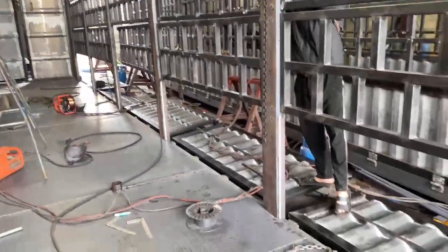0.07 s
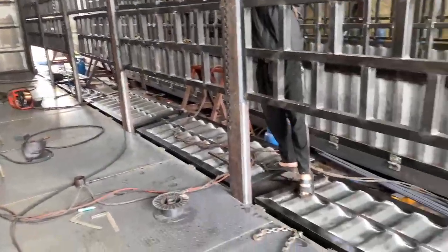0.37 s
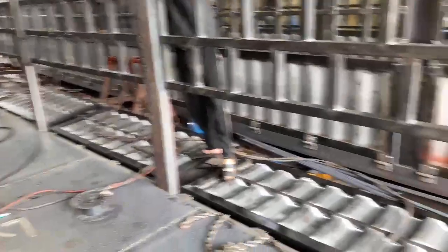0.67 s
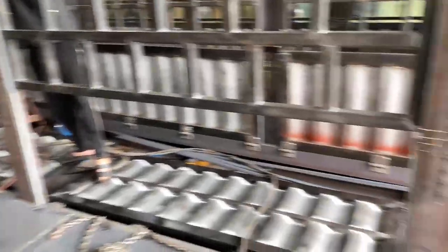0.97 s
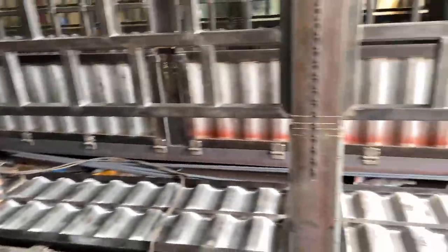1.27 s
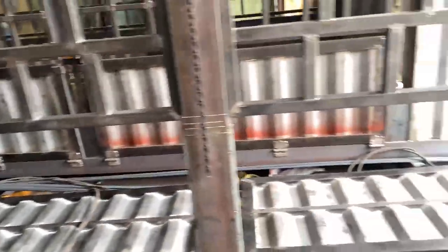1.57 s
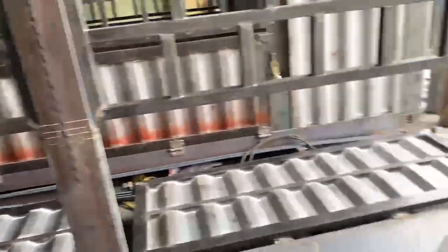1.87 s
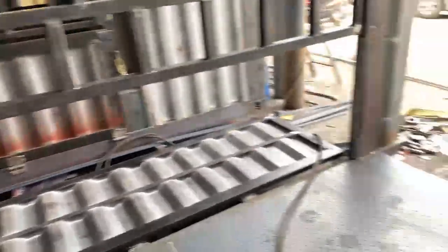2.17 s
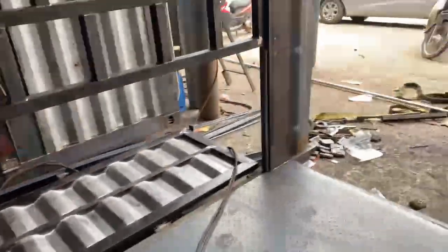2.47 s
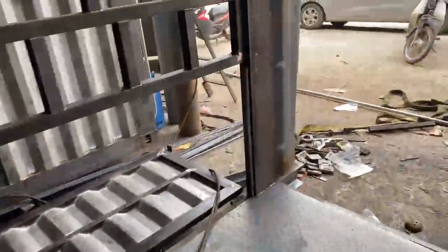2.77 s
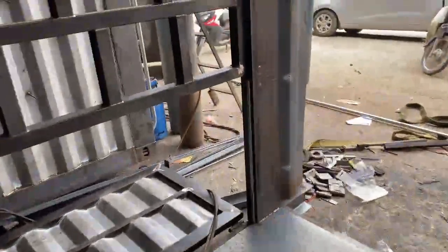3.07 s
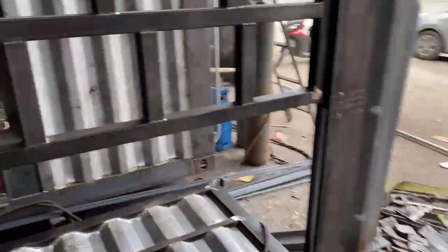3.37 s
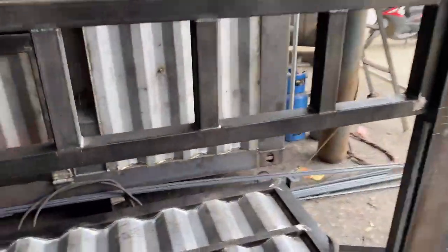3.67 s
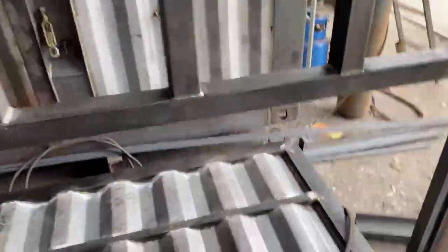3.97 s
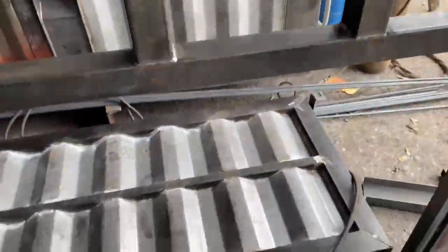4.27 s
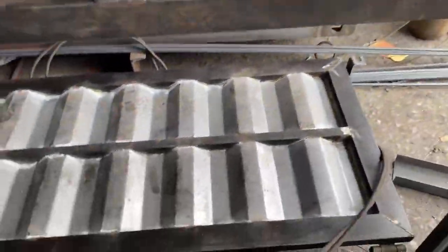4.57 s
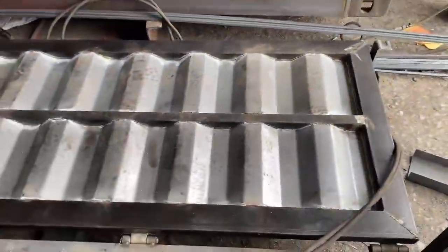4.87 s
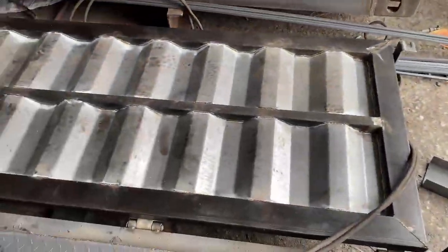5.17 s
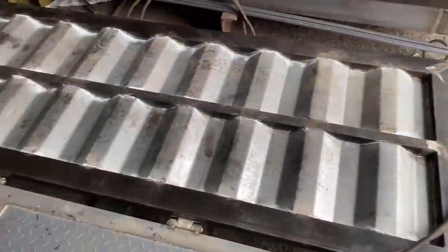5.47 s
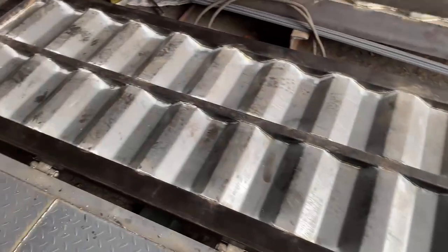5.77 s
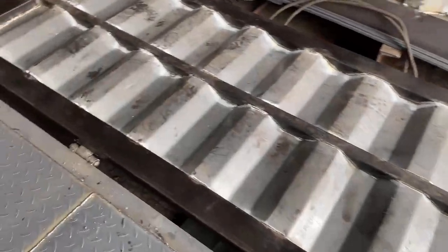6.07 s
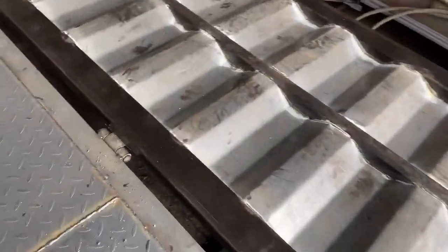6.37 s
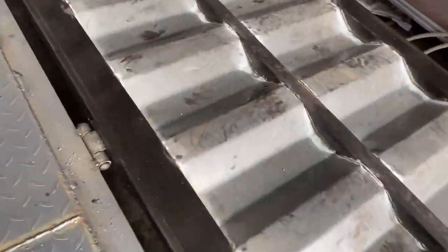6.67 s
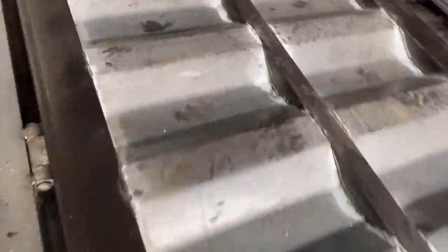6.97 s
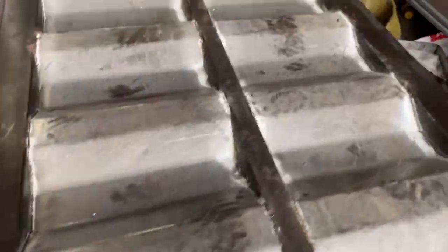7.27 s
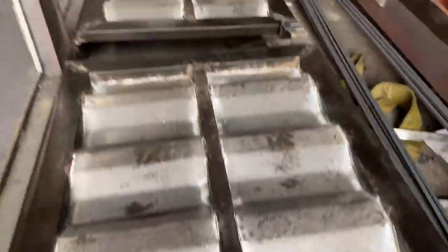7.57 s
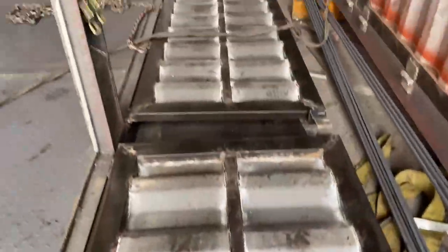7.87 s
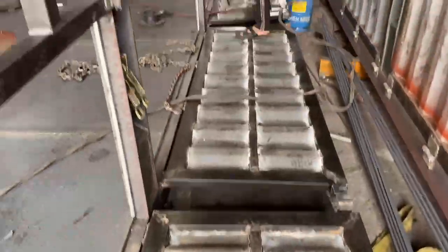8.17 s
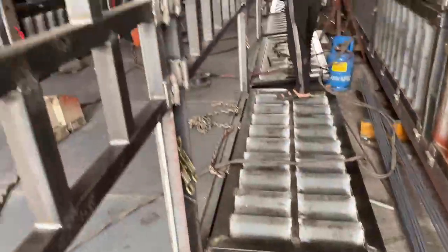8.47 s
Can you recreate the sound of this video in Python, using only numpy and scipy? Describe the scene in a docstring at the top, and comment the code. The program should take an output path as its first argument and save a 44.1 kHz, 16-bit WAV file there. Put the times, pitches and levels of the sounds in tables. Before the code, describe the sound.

A hammer strikes the steel frame of a truck body about twice a second, each sharp clang leaving the frame and its ribbed sheets ringing through a workshop. After five blows it pauses, and softer knocks and a faint steel clink sound farther off. Six more blows follow with less crack, as if the microphone faces away. An engine throbs faintly outside over a steady street hush.

```python
"""In a workshop, a hammer strikes the steel frame of a truck body: two runs of blows with a pause between.
Each blow cracks, clangs the struck bar, sets the frame and its ribbed sheets ringing and fills the hall;
most are followed by a soft shudder of the sheets. The second run is heard facing away, with less crack.
In the pause, lesser knocks sound about the shop and a loose piece of steel clinks as it settles.
An engine throbs outside, over the street's hush."""
import sys
import numpy as np
from scipy import signal
from scipy.fft import rfft, irfft
from scipy.io import wavfile
from scipy.ndimage import uniform_filter1d

SR = 44100
rng = np.random.default_rng(int(sys.argv[2]) if len(sys.argv) > 2 else 0)


def pcm_store(signal):
    """Save signal as 16-bit PCM."""
    levels = np.round(np.clip(np.atleast_2d(signal), -1, 1) * 32767)
    wavfile.write(sys.argv[1], SR, levels.astype(np.int16).T)


N = 380624
RING_SIZE = 98304  # samples in which one blow rings out
AGE = np.arange(RING_SIZE) / SR  # s since the onset
FREQ = np.fft.rfftfreq(RING_SIZE, 1 / SR) + 1  # Hz, kept above zero for the log axes
SIDES = np.array([[1], [-1]])  # left, right


# hammer hits, with each layer's trim: t/s, level/dB, direct crack/dB, clang/dB, bite f/Hz, bite/dB,
# clank/dB, clank length/ms, thud/dB, low partials/dB, bar ring/dB, bar centre f/Hz, shudder/dB
BLOW_CUES = [(-0.267, 1.5, 6.5, 6, 3050, 14, -9, 15, -0.5, 6, 0, 1900, 3.5),
             (0.1975, 2.5, 5, 1.5, 3330, -4, -3, 26, -0.5, 1, -6, 1750, 4.5),
             (0.6579, 0.5, 5.5, 0, 3300, -7, 0, 28, -1, 6, -4, 1940, 5),
             (1.148, -0.14, 3, 2, 3030, 8, 0, 23, 0, -3, -1, 1780, 2.5),
             (1.6095, 0.5, 4, 0, 1920, 24, -7, 30, -0.5, -5, 0, 2050, -4),
             (2.292, -0.3, 3, 2.5, 2840, 17, -17.5, 13, 1, 1.5, -4, 1980, -33),
             (5.1223, 2.5, -17, -0.5, 1370, 32, -6.5, 28, -2.5, -2, -5, 1480, 0.5),
             (5.602, 2.5, -5.5, 3.5, 3600, 2, -2.5, 32, 0, -6, -6, 1900, 4),
             (6.1101, 1, -2, -0.5, 2880, 0, 0, 37, -1.5, -13, -2, 2850, 5),
             (6.599, 1, 2, 2, 1500, 6, -3, 38, -1, -14, 1, 1000, 2.5),
             (7.139, 1.5, -20, -1, 2900, -12, -0.5, 52, 1.5, 4.5, -4, 680, 4),
             (7.459, -6, -10, 5.5, 2800, 12, -14, 56, 0, 1, -0.5, 680, -35)]
# panning of crack, clank and dense ring: f/Hz, left minus right/dB
BLOW_PAN = [(130, -1), (300, -1), (620, 3), (1000, 2.5), (2000, -2.5), (4000, 0.5), (12000, 0)]

def hammering(fades, frame_db, ring_db=-7.5, crack_db=11.5, partial_db=-30, bite_share=0.13):
    """Every blow sounds through the same frame, coloured by the spot where it lands."""
    pan = undb(SIDES * at(BLOW_PAN, FREQ) / 2)
    treble_octaves = np.log2(np.maximum(FREQ / 1000, 1))
    bar_clang, sheet_thud = hump(hz=725, octaves=0.26), hump(hz=170, octaves=0.98)
    fade_out = np.minimum(2 * AGE[::-1], 1)
    out = np.zeros((2, N))
    for (s, db, direct_db, clang_db, bite_hz, bite_db, clank_db, clank_ms,
         thud_db, low_db, bar_db, bar_hz, _) in BLOW_CUES:
        # the less crack comes straight, the slower, brighter and richer in early reflections the ring
        swell_ms = 5.8 - 0.61 * direct_db
        tilt_db = (2.5 - 0.044 * direct_db) * treble_octaves
        early_db = -9.5 - 0.49 * direct_db
        spot_db = tilt_db + clang_db * bar_clang + thud_db * sheet_thud + 2 * mode_ripple(70)
        bite = undb(bite_db * hump(bite_hz, octaves=0.24))
        # sound runs faster in steel than in air, so the nearby sheets stir before the crack arrives
        lead_s = swell_ms / 1000
        contact = undb(crack_db + direct_db) * crack() * bite * delay(FREQ, lead_s)
        body = undb(ring_db) * dense_ring(fades, swell_ms, early_db) * bite ** bite_share
        body += undb(clank_db) * clank(swell_ms, clank_ms) * np.sqrt(bite)
        blow = irfft((contact + body) * minimum_phase(frame_db + spot_db) * pan)
        blow += undb(partial_db) * frame_ring(low_db, swell_ms)
        add(out, undb(db) * blow * fade_out, s - lead_s)
        add(out, undb(db + bar_db) * bar_ring(bar_hz), s)
    return out


# EQ of the crack, on top of the frame's colour: f/Hz, level/dB
CRACK_EQ = [(100, -33), (350, -19), (700, 14), (1400, -3.5), (3000, -9), (7000, -4), (15000, 4)]

def crack(scatter_s=0.0022, right_lag_s=0.000308, echo_s=0.0075, echo_db=-2.0, even_below_hz=1100):
    """Spectrum of the hammer's contact, scattered briefly by the frame and rebounding off the deck."""
    bursts = rfft(rng.standard_normal((3, RING_SIZE)) * np.exp(-np.minimum(AGE / scatter_s, 20)))
    # the low modes are driven alike every time, the treble depends on how the face lands
    evenness = np.minimum(even_below_hz / FREQ, 1)
    bursts /= np.abs(bursts) ** evenness
    bursts /= np.sqrt(scatter_s * SR / 2) ** (1 - evenness)
    direct = bursts[0] * np.array([np.ones(len(FREQ)), delay(FREQ, right_lag_s)])
    rebound = undb(echo_db) * bursts[1:] * delay(FREQ, echo_s)
    return (direct + rebound) * minimum_phase(at(CRACK_EQ, FREQ))


# EQ of the clank, on top of the frame's colour: f/Hz, level/dB
CLANK_EQ = [(150, -40), (240, -19), (380, -2.5), (800, -3.5), (1300, -12.5), (2500, -2.5), (4100, -4),
            (6000, -5), (12000, 1), (15000, 4)]

def clank(swell_ms, length_ms):
    """Spectrum of the struck member clanking until it has passed its motion on to the frame."""
    size = RING_SIZE // 8
    envelope = swell(swell_ms) * np.exp(-(AGE * 1000 / length_ms) ** 2)
    burst = irfft(diffuse(size)) * envelope[:size]
    return rfft(burst, RING_SIZE) * undb(at(CLANK_EQ, FREQ))


# short-lived modes of the struck bar: f/Hz, level/dB, t60/s
BAR_MODES = [(657, 8, 0.16), (712, 5, 0.085), (965, 1, 0.13), (1450, -15, 0.24), (1597, -10.5, 0.22),
             (1790, -8, 0.24), (1925, -11, 0.1), (2186, -0.5, 0.2), (2890, -22, 0.097), (3360, -4, 0.25)]

def bar_ring(centre_hz, bar_db=-24, favour_db=5.5, favour_octaves=0.18):
    """The struck bar rings hard and briefly; where the hammer lands decides which modes lead."""
    modes = [(hz, db + favour_db * np.exp(-(np.log2(hz / centre_hz) / favour_octaves) ** 2), t60)
             for hz, db, t60 in BAR_MODES]
    return undb(bar_db) * partials(modes, detune=0.0036) * swell(ms=1.4)


# partials of the frame that sing on: f/Hz, level/dB, t60/s
FRAME_MODES = [(381, -10, 4.2), (390, -16, 4.4), (399, -17, 3.6), (508, -8, 2.4), (672, -4, 2),
               (666, -4.5, 2.3), (789, -8.5, 3.2), (782, -11.5, 2.3), (978, -5, 0.89), (1030, -12, 2.9),
               (1070, -8, 2.1), (1324, -16, 1.8), (1432, -17, 2), (1588, -13, 1.3), (1778, -12, 1.3),
               (1940, -13, 1.2), (2125, -13, 0.6), (2305, -12, 1.1), (2460, -14, 0.7), (2665, -15, 1.2),
               (2840, -11, 0.9), (2885, -11, 1.1), (2965, -10, 0.9), (3130, -13, 1), (3420, -9, 0.6),
               (3941, -16, .5), (4430, -17, .6), (4730, -15, .6), (5070, -13, 0.6), (5600, -16, .55)]

def frame_ring(low_db, swell_ms, low_below_hz=450):
    """The frame's pitched sustain; how hard its lowest modes are woken depends on the spot struck."""
    modes = [(hz, db + low_db * (hz < low_below_hz), t60) for hz, db, t60 in FRAME_MODES]
    return partials(modes, detune=0.00095) * swell(swell_ms)


def partials(modes, detune, spread_db=1.5, waver_per_s=22, waver_depth=0.45):
    """Steel modes wake differently at each hit and waver as they trade motion with their neighbours."""
    out = np.zeros((2, RING_SIZE), np.float32)
    knots = np.arange(0, 3, 1 / waver_per_s)
    for hz, db, t60 in modes:
        t = AGE[:int(t60 * SR)]
        softness, mistuning = rng.standard_normal(2)
        phase = 2 * np.pi * hz * (1 + detune * mistuning) * t + rng.uniform(0, 2 * np.pi, (2, 1))
        wavers = waver_depth * rng.standard_normal((2, len(knots)))
        level_sway, phase_slip = (np.interp(t, knots, row) for row in wavers)
        envelope = undb(db - spread_db * softness - 60 * t / t60) * (1 + level_sway)
        out[:, :len(t)] += envelope * np.sin(phase + 2 * phase_slip)
    return out


# broad EQ of the dense modes of frame and sheets: f/Hz, level/dB
FRAME_EQ = [(30, -38.5), (110, -14.5), (250, -4.5), (450, -1.5), (680, 1.5), (870, 1), (1300, -6.5),
            (2300, -9.5), (3200, -11), (4200, -12.5), (6500, -20), (9000, -27), (11500, -29), (15500, -47)]
# the frame's resonances and the notches between them: f/Hz, width/Hz, boost/dB
FRAME_PEAKS = [(203, 12, 5), (226, 24, -6), (385, 20, 8), (435, 45, -2.5), (512, 24, 3), (605, 30, 2.5),
               (668, 42, 4.5), (722, 22, 4), (796, 34, 6), (872, 45, -5), (942, 42, 9), (1026, 19, 5.5),
               (1090, 75, 7), (1320, 40, 3), (1385, 45, -2), (1505, 40, 2), (1592, 35, 3), (1778, 24, 6.5),
               (1935, 55, 4.5), (2120, 45, 1.5), (2195, 45, -3.5), (2305, 60, 3), (2450, 80, -1),
               (2670, 50, 3), (2790, 40, 3.5), (2844, 36, 4.5), (2962, 60, 4), (3130, 90, 2), (3340, 70, 2),
               (3560, 110, 2), (3840, 120, -2), (5160, 130, 2)]

def frame_colour():
    """Gain of frame and sheets in dB: dense modes, with the resonances standing above them."""
    peaks_db = sum(db / (1 + (2 * (FREQ - hz) / width) ** 2) for hz, width, db in FRAME_PEAKS)
    return at(FRAME_EQ, FREQ) + peaks_db + .9 * mode_ripple(26)


def mode_ripple(width_hz, full_above_hz=2000):
    """Chance peaks and dips of the crowded upper modes, with a spread of 1 in the treble."""
    bins = max(int(width_hz * RING_SIZE / SR), 2)
    ripple = smooth(rng.standard_normal(len(FREQ)), bins)
    return ripple / ripple.std() * np.minimum(FREQ / full_above_hz, 1)


# decay time of frame and hall together: f/Hz, t60/s
HALL_DECAY = [(100, 2.8), (260, 2.01), (700, 1.426), (1500, 1.624), (3000, 1.143), (5000, 0.88),
              (8000, 0.64), (12000, 0.45), (16000, 0.37)]

def hall_fades():
    """Pairs of band and fade: frame and hall hold the bass longest."""
    hz, t60s = np.transpose(HALL_DECAY)
    bands = [np.interp(np.log(FREQ), np.log(hz), row) for row in np.eye(len(hz))]
    return [(np.float32(band), np.float32(undb(-60 * AGE / t60))) for band, t60 in zip(bands, t60s)]


def dense_ring(fades, swell_ms, early_db=3, early_s=0.021):
    """Spectrum of countless modes and reflections: a swell, a stronger early part, a darkening tail."""
    field = diffuse(RING_SIZE).astype(np.complex64)
    tail = sum(irfft(field * band) * fade * rattle() for band, fade in fades)
    early_boost = 1 + undb(early_db) * np.exp(-AGE / early_s)
    return rfft(tail * swell(swell_ms) * early_boost)


def rattle(changes_per_s=60, depth_db=1.4):
    """Sheets chatter against their ribs, so each band of the ring dies away unevenly."""
    knots = np.arange(0, 3, 1 / changes_per_s)
    gain = undb(depth_db * rng.standard_normal(len(knots)))
    return np.float32(np.interp(AGE, knots, gain / gain.mean()))


def swell(ms):
    """Attack envelope: vibration takes a moment to spread through the steel."""
    return 1 - np.exp(-(AGE / (ms / 1000)) ** 2)


def shudders(frame_db, after_s=0.389, rise_s=0.1, fade_s=0.25, sheets_db=-21.5, dull_hz=5000,
             low_hz=385, low_s=0.018, low_db=-38.5):
    """A moment after a blow the loose sheets shudder softly and the frame's lowest ring swells again."""
    from_peak = AGE - after_s
    envelope = np.where(from_peak < 0, np.exp(-(from_peak / rise_s) ** 2), np.exp(-from_peak / fade_s))
    low_envelope = np.exp(-(from_peak / low_s) ** 2)
    colour = undb(frame_db) / np.hypot(1, FREQ / dull_hz)
    out = np.zeros((2, N))
    for s, _, direct_db, *_, db in BLOW_CUES:
        sheets = undb(sheets_db) * irfft(diffuse(RING_SIZE) * colour) * envelope
        phase = 2 * np.pi * low_hz * AGE + rng.uniform(0, 2 * np.pi) + rng.uniform(0, 1, (2, 1))
        # like the crack, the low ring is heard only by the straight path
        low_ring = undb(low_db + direct_db) * np.sin(phase) * low_envelope
        add(out, undb(db) * (sheets + low_ring), s)
    return out


# lesser knocks about the shop: t/s, level/dB, centre f/Hz, width/octaves, attack/ms, early decay/ms
KNOCK_CUES = [(2.033, -40.5, 7000, 2.4, 4.7, 100), (3.53, -25, 2080, 1.6, 74, 430),
              (4.049, -12, 840, 1.08, 39, 140), (4.11, -7.5, 420, 1.7, 63, 76),
              (4.085, -5.5, 250, 0.89, 43, 110)]

def knocks(fades, trim_db=-13):
    """Lighter contacts, heard only by way of the hall."""
    out = np.zeros((2, N))
    for s, db, hz, octaves, swell_ms, early_ms in KNOCK_CUES:
        band_db = -60 * np.log10(1 + (np.log2(FREQ / hz) / octaves) ** 2 / 3)
        colour = minimum_phase(band_db + 3 * mode_ripple(40))
        reverb = dense_ring(fades, swell_ms, early_db=0, early_s=early_ms / 1000)
        add(out, undb(db + trim_db) * irfft(reverb * colour), s)
    return out


# touches of a loose piece of steel: t/s, level/dB
CLINK_CUES = [(3.545, -45.5), (3.6, -53), (3.725, -57)]
# modes of that piece: f/Hz, level/dB, t60/s
CLINK_MODES = [(905, -9, 0.8), (1690, -7, 1.2), (1976, -7, 1), (2210, -4, 0.7), (2345, 1, 0.7),
               (2595, -1, 0.6), (2670, -5, 0.7), (2977, 0, 0.5), (3343, 0, 0.7), (3885, -2, 1),
               (5222, -3, 0.4), (5545, -12, 0.6)]

def clink(fades, swell_ms=18, clatter_db=-39, clatter_hz=350):
    """Loose steel settles in a few ringing touches over a dull clatter, softened by distance."""
    out = np.zeros((2, N))
    for s, db in CLINK_CUES:
        add(out, undb(db) * partials(CLINK_MODES, detune=0.003185) * swell(swell_ms), s)
    lowpass_db = -20 * np.log10(np.hypot(1, FREQ / clatter_hz))
    clatter = dense_ring(fades, swell_ms) * minimum_phase(4 * mode_ripple(40) + lowpass_db)
    add(out, undb(clatter_db) * irfft(clatter), CLINK_CUES[0][0])
    return out


# the engine's fader, held at the first level until its first point: t/s, level/dB
ENGINE_FADER = [(4.6, -57), (5.44, -53), (5.47, -45.5), (5.9, -42.5), (6.02, -35.5), (7.54, -51),
                (7.8, -44), (8.48, -62.5), (8.63, -102)]

def engine(firing_hz=55.2, slows_at_s=8.1, sag_hz_per_s=7.3, waver=0.0211, throb_db=2, trim_db=-1):
    """An engine outside throbs unevenly, then slows; only the lowest orders of its firing get in."""
    t = np.arange(N) / SR
    hz = firing_hz - sag_hz_per_s * np.maximum(t - slows_at_s, 0)
    db = np.interp(t, *np.transpose(ENGINE_FADER))
    phase = 2 * np.pi * np.cumsum(hz * (1 + waver * drift(per_s=12))) / SR
    orders = np.sin(phase) + undb(-14) * np.sin(2 * phase) + undb(-18) * np.sin(3 * phase)
    return np.sqrt(2) * orders * undb(trim_db + db + throb_db * drift(per_s=5.3))


# EQ of the background bed: f/Hz, level/dB
HUSH_EQ = [(25, -32), (38, -35), (55, 2.5), (110, 5.5), (200, 2.5), (400, -2.5), (800, -2.5), (1300, -9),
           (2500, -12.5), (4500, -18.5), (6100, -16.5), (7500, -24), (11000, -23), (13000, -32),
           (15500, -37)]

def street(hush_db=-48.5, breeze_db=0.6):
    """The steady hush of street and shop, swaying slightly with the breeze."""
    hz = np.fft.rfftfreq(N, 1 / SR) + 1
    noise = irfft(diffuse(N) * undb(at(HUSH_EQ, hz)), N)
    return noise / noise.std() * undb(hush_db + breeze_db * drift(per_s=2))


# likeness of left and right in diffuse sound, rippling with their spacing: f/Hz, correlation
STEREO_LIKENESS = [(50, .99), (125, 0.87), (250, 0.82), (550, 0.25), (1600, -0.19), (2500, 0.04),
                   (4200, 0.08), (5500, -0.19), (7000, 0.44), (9300, -0.89), (11000, 1), (13300, -1.15),
                   (15500, 0.92)]

def diffuse(size, end_on_share=0.019, right_lag_s=0.00049):
    """Spectrum of white sound from all sides; a small share comes end-on and reaches the right late."""
    hz = np.fft.rfftfreq(size, 1 / SR) + 1
    mid, side, along = rfft(rng.standard_normal((3, size), np.float32))
    likeness = np.clip(at(STEREO_LIKENESS, hz), -1, 1)
    around = mid * np.sqrt((1 + likeness) / 2) + SIDES * side * np.sqrt((1 - likeness) / 2)
    end_on = np.array([along, along * delay(hz, right_lag_s)])
    return np.sqrt(1 - end_on_share) * around + np.sqrt(end_on_share) * end_on


def minimum_phase(db):
    """Filter response with the given gain that rings after the blow, never before."""
    cepstrum = irfft(np.log(undb(db)))
    cepstrum[1:RING_SIZE // 2] *= 2
    cepstrum[RING_SIZE // 2 + 1:] = 0
    return np.exp(rfft(cepstrum))


def drift(per_s):
    """Slow random modulation with a spread near 1."""
    hold = int(SR / per_s)
    steps = np.repeat(rng.standard_normal(N // hold + 1), hold)
    return 1.3 * smooth(steps, hold)[:N]


def smooth(x, size):
    """Two passes of a moving average."""
    return uniform_filter1d(uniform_filter1d(x, size), size)


def hump(hz, octaves):
    """An EQ bell of height 1 on the log-frequency axis."""
    return np.exp(-(np.log2(FREQ / hz) / octaves) ** 2)


def delay(hz, s):
    """Spectrum of a delay of s seconds."""
    return np.exp(-2j * np.pi * hz * s)


def at(points, hz):
    """Read (Hz, value) points on a log-frequency axis."""
    f, value = np.transpose(points)
    return np.interp(np.log(hz), np.log(f), value)


def undb(db):
    """Decibels to gain."""
    return 10 ** (np.asarray(db) / 20)


def add(out, sound, s):
    """Mix a sound in, starting at time s."""
    start = int(round(s * SR))
    a, b = max(start, 0), min(start + sound.shape[1], N)
    out[:, a:b] += sound[:, a - start:b - start]


def scene():
    """Hammering, knocks and a clink in one hall, over the sounds from outside."""
    fades, frame_db = hall_fades(), frame_colour()
    truck_body = hammering(fades, frame_db) + shudders(frame_db)
    return truck_body + knocks(fades) + clink(fades) + engine() + street()


def record(dry):
    """A soft clip rounds the highest peaks and a steep low-pass cuts the top."""
    top_hz = 16100
    rounded = dry / (1 + dry ** 6) ** (1 / 6)
    return signal.sosfilt(signal.ellip(8, .2, 70, top_hz, fs=SR, output="sos"), rounded)


dry = scene()
out = record(dry)
pcm_store(out)
```